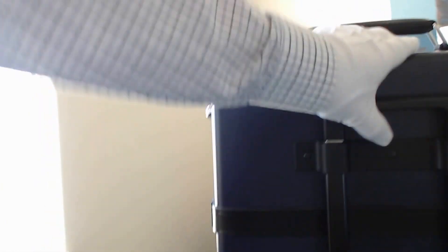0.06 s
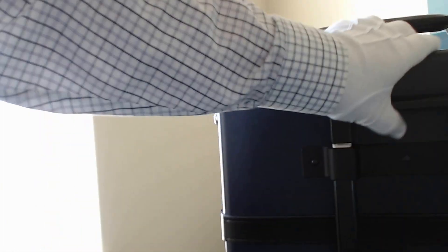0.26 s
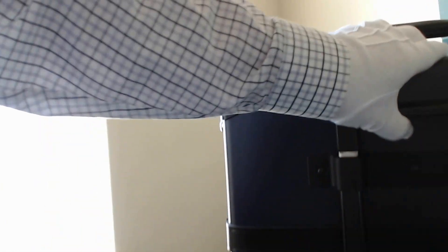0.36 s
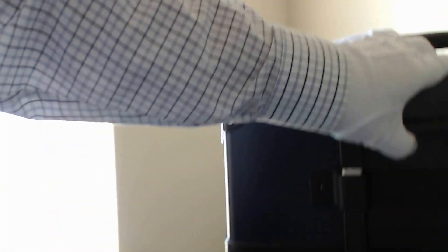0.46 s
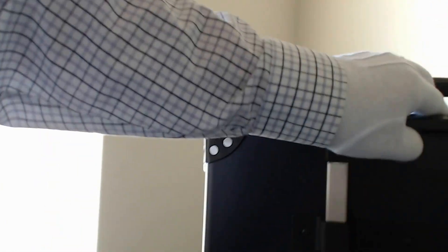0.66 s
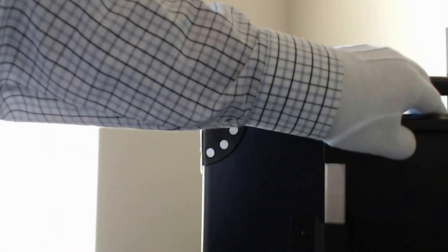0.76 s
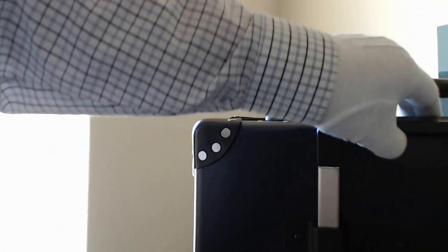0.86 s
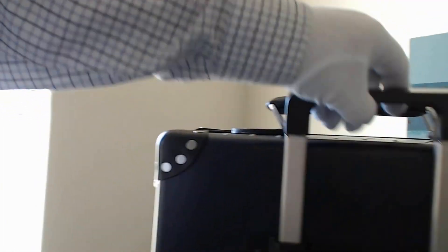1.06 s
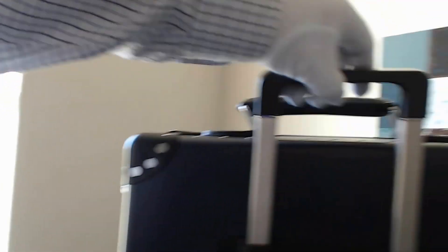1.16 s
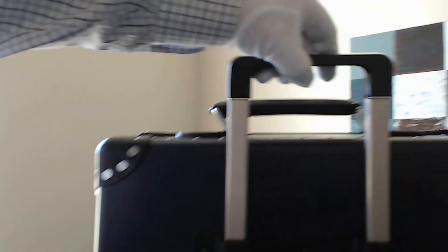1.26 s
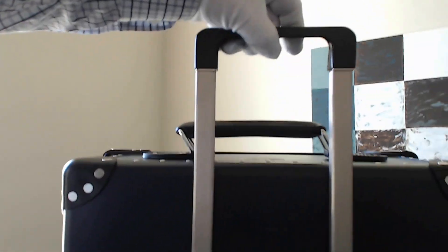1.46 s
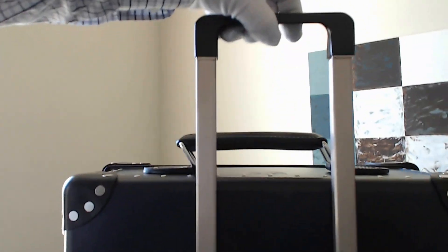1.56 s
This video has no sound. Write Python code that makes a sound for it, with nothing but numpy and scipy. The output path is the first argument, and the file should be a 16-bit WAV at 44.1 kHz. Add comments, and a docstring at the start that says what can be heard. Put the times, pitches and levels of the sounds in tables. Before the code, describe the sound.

A suitcase handle pulls up with two sharp clacks, then faint ticking and sliding.

```python
"""In a small, quiet room, a hand pulls up the telescopic handle of a suitcase.
The latch scrapes and lets go with a sharp clack, the case thuds, and a second stage catches with
another clack; both clacks set the modes of the hollow case ringing. The metal tubes then tick and
slide faintly in their guides, impact and friction exciting their resonances, while the case bumps
softly and the juddering handle gives a brief groan."""
import sys
import numpy as np
from scipy import signal
from scipy.fft import rfft, irfft
from scipy.io import wavfile
from scipy.ndimage import uniform_filter1d

SR = 44100
rng = np.random.default_rng(int(sys.argv[2]) if len(sys.argv) > 2 else 0)


def wav_out(sig):
    """Save sig, one row per channel (or a flat mono array), as 16-bit PCM at SR to the path in sys.argv[1]."""
    wavfile.write(sys.argv[1], SR, np.round(np.clip(np.atleast_2d(sig).T, -1, 1) * 32767).astype(np.int16))


N = 70560

# Spectrum of the low background. Each row: frequency in Hz, relative level in dB.
AIR_SPECTRUM = [(25, -23.5), (60, -17.5), (120, -3), (240, 4.5), (400, -3), (600, -12), (1200, -22.5),
                (2200, -23), (4500, -33.5), (7800, -39)]
# Soft bumps of the handled case. Each row: start in seconds, length in seconds, pitch in Hz, level in dB.
CASE_BUMPS = [(-.01, 0.039, 254, -58.5), (0.064, .04, 341.3, -50), (0.083, .04, 413, -51),
              (.095, .03, 539, -62), (.07, .05, 170.2, -51.5), (.12, 0.019, 122.7, -51),
              (0.199, .02, 284, -24.5), (0.397, 0.014, 438, -40.5), (.476, 0.044, 159.4, -44.5),
              (.815, 0.049, 166.5, -58.5), (0.863, 0.029, 219.4, -52.5), (0.981, 0.052, 237, -61.5),
              (1.058, 0.031, 225, -55.5), (1.075, 0.026, 138.4, -57), (1.116, 0.036, 172.3, -56.5),
              (1.197, 0.063, 223.3, -56), (1.266, 0.017, 415, -47), (1.346, 0.0233, 346, -49),
              (1.377, 0.029, 408, -52), (1.425, 0.016, 160, -51), (1.513, 0.03, 157.7, -54),
              (1.522, 0.024, 238.6, -48)]
# The latch scraping under load. Each row: start in seconds, length in seconds, final level in dB.
LATCH_SCRAPES = [(.195, 0.013, -41), (0.514, .015, -43)]
# Impacts of the latch letting go, the second stage catching, the blows to the shell and the thud.
# Each row: start in seconds, level in dB.
RELEASE_HITS = [(.2123, 18.5), (.2141, 17.5), (.2152, 3), (.2195, 6), (.2222, 2)]
CATCH_HITS = [(.5275, 10), (.5306, 10.5), (.5333, 6.5)]
SHELL_HITS = [(.2135, 7), (.533, 6.5)]
THUD_HITS = [(.4136, 2.5), (.428, -10.5), (.436, -2)]
# Spectra of those four kinds of impact. Each row: frequency in Hz, gain in dB.
RELEASE_SPECTRUM = [(30, -46.5), (60, -29), (105, 0), (200, 3), (420, 5.5), (660, 7), (1100, -4),
                    (1550, -13.5), (1950, -1), (2250, -1), (2800, -8), (4400, 1), (6200, -7.5),
                    (7800, -13.5)]
CATCH_SPECTRUM = [(30, -51), (110, -31), (260, -3), (540, 5), (800, -3.5), (1100, -26.5), (1700, -14),
                  (2300, 3.5), (3100, -5), (4400, 0), (5800, -15), (7600, -21.5)]
SHELL_SPECTRUM = [(30, -49), (110, -14.5), (270, 1.5), (400, 4.5), (540, 4), (850, -0.5), (1150, -9),
                  (1600, -6.5), (2200, -4.5), (3200, -9), (4600, -4), (6000, -14), (7600, -20.5)]
THUD_SPECTRUM = [(30, -51.5), (120, 4), (270, -8.5), (450, -1), (850, -1.5), (1200, -8.5), (2000, -11.5),
                 (3200, -22.5), (5000, -40), (8000, -57)]
# Modes of the case. Each row: frequency in Hz, T60 in seconds, level in dB at release, then at catch.
CASE_MODES = [(105.54, 0.31, -25, -47.5), (136.8, 0.3, -29, -42.5), (188.2, 0.21, -24.5, -47.5),
              (211, 0.26, -28.5, -49.5), (262, .15, -28, -28.5), (336, .18, -23, -24.5),
              (381.5, .31, -22, -48.5), (393, .1, -13, -27), (459.6, 0.22, -28, -34.5),
              (478, 0.24, -39, -36.5), (562, 0.12, -28.5, -30.5), (627, .13, -26.5, -35),
              (702.5, .14, -42, -34), (798, 0.18, -39.5, -41.5)]
# Ticks of the tubes in their guides. Each row: start in seconds, level in dB.
TUBE_TICKS = [(.6517, -5), (.7086, -9.5), (.7665, -8), (.8278, -13), (.8607, -17), (1.0074, -26.5)]
# Modes of the tubes. Each row: frequency in Hz, half-bandwidth per filter stage in Hz, gain in dB.
TUBE_MODES = [(2030, 480, -24), (3926, 185, -2.5), (5870, 220, -9), (7020, 172, -21)]
# Resonances of the sliding tubes. Each row: frequency in Hz, bandwidth per filter stage in Hz.
SLIDE_RESONANCES = [(2050, 390), (3230, 400), (4000, 720), (6300, 1900)]
# Envelopes of those four resonances and of the broad rubbing hiss. Each row: time in seconds, level in dB.
LOW_LEVELS = [(.82, -101), (.888, -60), (.912, -71.5), (.965, -64.5), (1.002, -78.5), (1.15, -75),
              (1.173, -58), (1.19, -68.5), (1.254, -58), (1.264, -67.5), (1.323, -61), (1.35, -74.5),
              (1.43, -71), (1.6, -86)]
MID_LEVELS = [(1.12, -87), (1.23, -75), (1.25, -62.5), (1.3, -76), (1.401, -91)]
HIGH_LEVELS = [(0.821, -82), (0.883, -57.5), (.91, -68), (.935, -71.5), (.96, -78.5), (1.249, -95.5),
               (1.33, -72.5), (1.42, -86.5)]
RASP_LEVELS = [(0.819, -81), (.875, -66.5), (.895, -69), (.92, -89), (1.02, -79.5), (1.05, -102)]
RUB_LEVELS = [(.7, -101), (.88, -74), (.98, -75.5), (1.1, -68.5), (1.23, -68), (1.38, -71.5), (1.6, -73)]
# Spectrum of the rubbing hiss. Each row: frequency in Hz, relative level in dB.
RUB_SPECTRUM = [(100, -16), (300, 5), (700, 0), (1300, -1.5), (3000, -10), (5500, -10.5), (6800, -11.5),
                (7600, -11)]
# Judder of the handle. Each row: start in seconds, length in seconds, pitch in Hz, level in dB.
JUDDERS = [(1.275, 0.051, 158, -41.5)]
# Reverberation. Each row: frequency in Hz, T60 in seconds, level in dB against the direct sound.
ROOM_BANDS = [(101, 0.36, -12.5), (298, 0.34, -7), (700, .22, -8), (1800, 0.24, -12), (4500, 0.38, -12),
              (7300, 0.41, -10)]


def amp(db):
    """Amplitude ratio of a level in decibels."""
    return 10 ** (np.asarray(db) / 20)


def unit(x):
    """Normalisation to an rms of 1."""
    return x / np.sqrt(np.mean(x ** 2))


def since(start):
    """Seconds elapsed since a moment, zero before it."""
    return np.maximum(np.arange(N) / SR - start, 0)


def fade(t, t60):
    """Exponential damping: 60 dB in t60 seconds."""
    return np.exp(-np.log(1000) * t / t60)


def envelope(points):
    """Gain interpolated through (s, dB) points, silent before the first."""
    times, db = np.array(points).T
    return amp(np.interp(since(0), times, db)) * (since(0) >= times[0])


def convolve(x, response):
    """Output of a linear system with the given impulse response."""
    return signal.fftconvolve(x, response)[:N]


def colour(x, spectrum):
    """Minimum-phase filtering through (Hz, dB) points."""
    size = 8192
    hz, db = np.array(spectrum).T
    log_hz = np.log(np.arange(size // 2 + 1) * SR / size + 1)
    cepstrum = irfft(np.log(amp(np.interp(log_hz, np.log(hz), db))))
    cepstrum[1:size // 2] *= 2  # folding makes the response causal
    cepstrum[size // 2 + 1:] = 0
    return convolve(x, irfft(np.exp(rfft(cepstrum))))


def resonate(x, hz, width_hz):
    """Resonance: two identical stages in cascade, with gain 1 at the centre."""
    b, a = signal.iirpeak(hz, hz / width_hz, fs=SR)
    return signal.lfilter(b, a, signal.lfilter(b, a, x))


def air(level_db=-63.5):
    """Stationary noise, weighted to low frequencies, forms the background."""
    return amp(level_db) * unit(colour(rng.standard_normal(N), AIR_SPECTRUM))


def bumps():
    """Forced vibration: soft pushes rock the case for a few cycles."""
    out = 0
    for start, length, hz, db in CASE_BUMPS:
        t = since(start)
        swell = np.sin(np.pi * np.minimum(t / length, 1))
        out += amp(db) * swell * np.sin(2 * np.pi * hz * t)
    return out


def friction(roughness=.2, grain_samples=128):
    """Stick-slip friction: noise in dense grains of uneven strength."""
    strength = np.repeat(rng.standard_normal(N // grain_samples + 1), grain_samples)[:N]
    strength = uniform_filter1d(strength, size=grain_samples)
    return unit(rng.standard_normal(N) * np.exp(roughness * strength))


def scrapes():
    """Friction under load: the latch scrapes with rising strength just before each clack."""
    load = sum(amp(db) * np.sqrt(since(start) / length) * (since(start) < length)
               for start, length, db in LATCH_SCRAPES)
    return load * unit(resonate(friction(), hz=2500, width_hz=1200))


def impacts(hits, t60, rattle_share):
    """Impact excitation: the energy divides between an impulse and a dense, dying rattle."""
    out = np.zeros(N)
    for start, db in hits:
        hit = rng.standard_normal(N) * fade(since(0), t60)
        hit *= np.sqrt(rattle_share / np.sum(hit ** 2))
        hit[0] -= np.sqrt(1 - rattle_share)
        onset = int(start * SR)
        out[onset:] += amp(db) * hit[:N - onset]
    return out


def clacks():
    """Hard impact: release and catch are each a quick cluster of contacts whose parts rattle briefly."""
    return sum(colour(impacts(hits, t60=.021, rattle_share=.71), spectrum)
               for hits, spectrum in [(RELEASE_HITS, RELEASE_SPECTRUM), (CATCH_HITS, CATCH_SPECTRUM)])


def case_ring(release_s=.2128, catch_s=.5328):
    """Free vibration: after each clack the modes of the hollow case decay as damped sinusoids."""
    out = 0
    for hz, t60, *levels in CASE_MODES:
        for start, db in zip((release_s, catch_s), levels):
            t = since(start)
            out -= amp(db) * np.sin(2 * np.pi * hz * t) * fade(t, t60)
    return out


def shell_ring():
    """Modal overlap: the shell's many close modes blur into a short, rough ring after each clack."""
    return colour(impacts(SHELL_HITS, t60=.25, rattle_share=.99), SHELL_SPECTRUM)


def thud():
    """Dull impact: between the clacks the loose shell is struck, and rattles longer than the latch."""
    return colour(impacts(THUD_HITS, t60=.11, rattle_share=.65), THUD_SPECTRUM)


def ticks():
    """Resonant filtering: light contacts with the guides excite the modes of the tubes."""
    contacts = impacts(TUBE_TICKS, t60=.068, rattle_share=1)
    return sum(amp(db) * resonate(contacts, hz, 2 * half_width) for hz, half_width, db in TUBE_MODES)


def slide():
    """Sliding friction drives the resonances of the extending tubes by turns, over a broad hiss."""
    rub, out = friction(), 0
    for (hz, width), levels in zip(SLIDE_RESONANCES, (LOW_LEVELS, MID_LEVELS, HIGH_LEVELS, RASP_LEVELS)):
        out += envelope(levels) * unit(resonate(rub, hz, width))
    return out + envelope(RUB_LEVELS) * unit(colour(friction(), RUB_SPECTRUM))


def groan(edge_s=.0028, overtone_db=-17.5):
    """Periodic vibration: the handle judders in its guides, sounding a fundamental and its octave."""
    out = 0
    for start, length, hz, db in JUDDERS:
        t = since(start)
        gate = np.clip(np.minimum(t, length - t) / edge_s, 0, 1)
        phase = 2 * np.pi * hz * t
        out += amp(db) * gate * (np.sin(phase) + amp(overtone_db) * np.sin(2 * phase))
    return out


def room(x, delay_s=.0013, build_s=.0034):
    """Reverberation: diffuse reflections build up, then die at their own rate in each band."""
    t, response = since(delay_s), 0
    noise = rfft(rng.standard_normal(N))
    log_hz = np.log(np.arange(N // 2 + 1) * SR / N + 1)
    log_centres = np.log(np.array(ROOM_BANDS)[:, 0])
    for weights, (_, t60, db) in zip(np.eye(len(ROOM_BANDS)), ROOM_BANDS):
        band = irfft(noise * np.interp(log_hz, log_centres, weights), N)
        shape = (1 - np.exp(-t / build_s)) * fade(t, t60)
        response += amp(db) * band * shape / np.sqrt(np.sum(shape ** 2))
    return convolve(x, response)


def scene(case_send_db=-1.5):
    """Superposition: handle and case with their reflections, the shell's ring and the background."""
    handle = clacks() + thud() + scrapes() + ticks() + slide()
    case = bumps() + case_ring() + groan()
    direct = air() + handle + case + shell_ring()
    return (direct + room(handle + amp(case_send_db) * case))[None]


def record(dry, bass_hz=87, top_hz=7900, ceiling=.58):
    """Saturation and band limiting: the microphone rounds the peaks and loses deep bass and top."""
    lowpass = signal.ellip(10, .2, 70, top_hz, fs=SR, output="sos")
    highpass = signal.butter(4, bass_hz, "high", fs=SR, output="sos")
    rounded = ceiling * np.tanh(signal.sosfilt(lowpass, dry) / ceiling)
    return signal.sosfilt(lowpass, signal.sosfilt(highpass, rounded))


dry = scene()
out = record(dry)
wav_out(out)
```